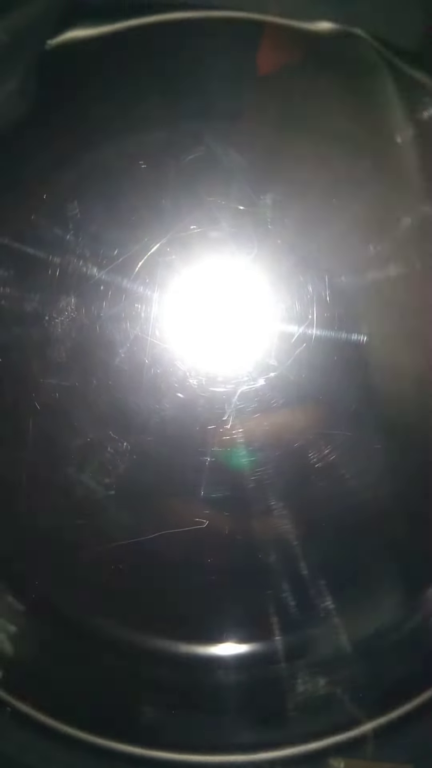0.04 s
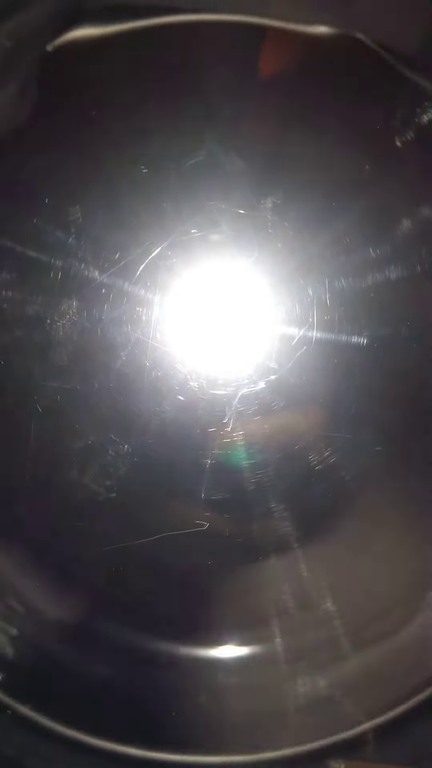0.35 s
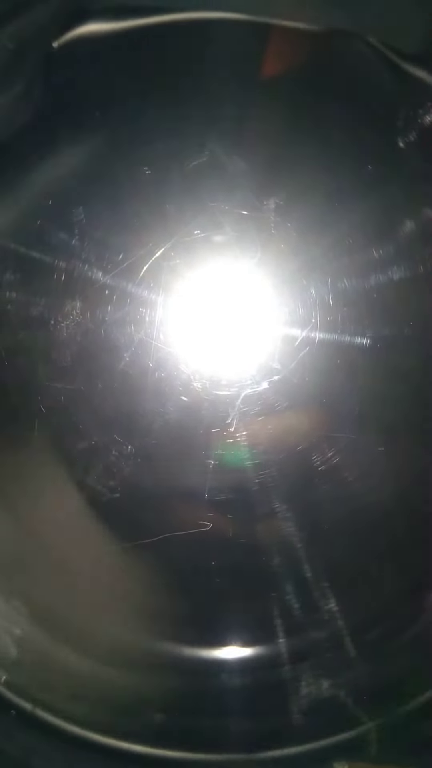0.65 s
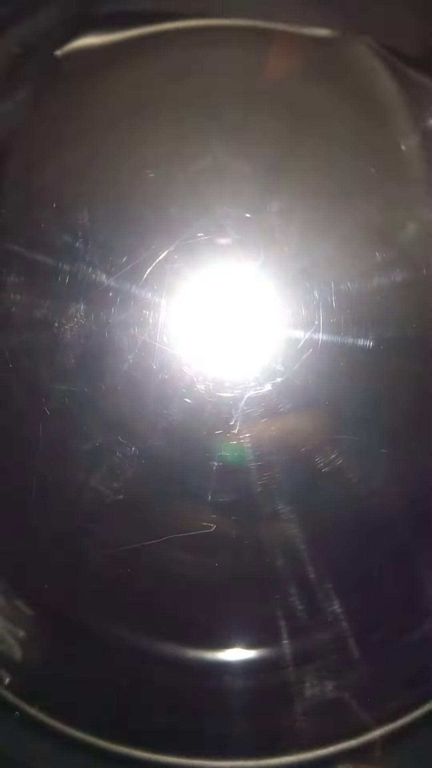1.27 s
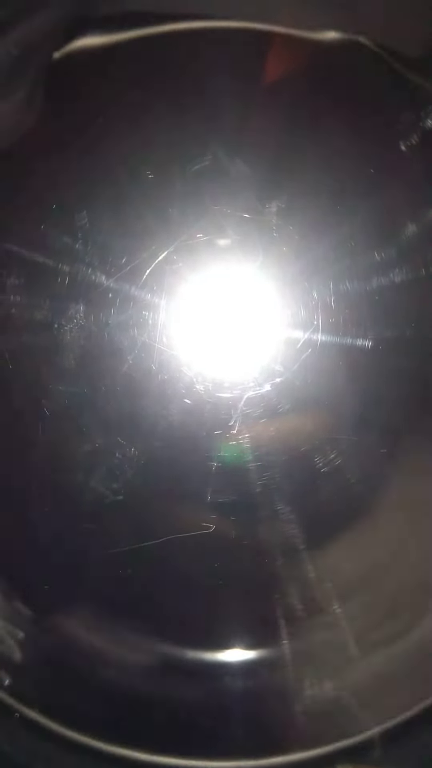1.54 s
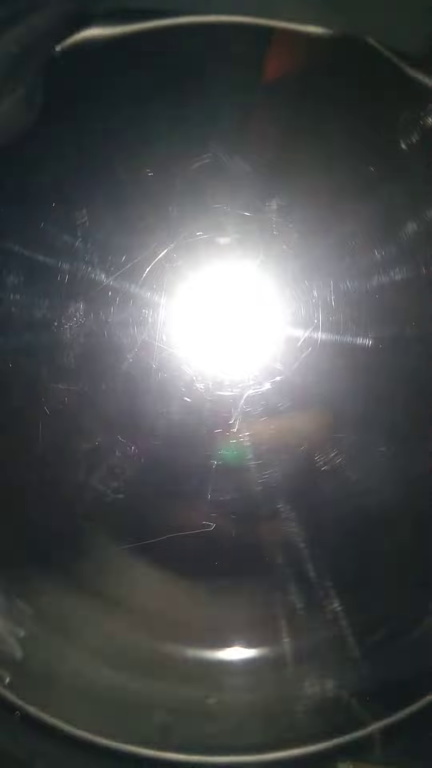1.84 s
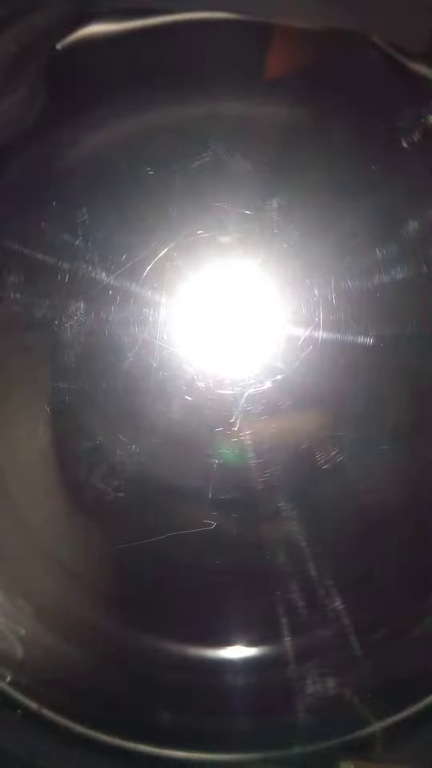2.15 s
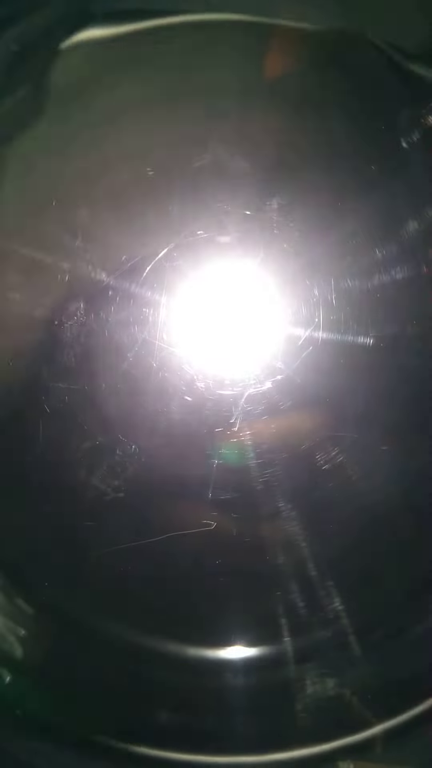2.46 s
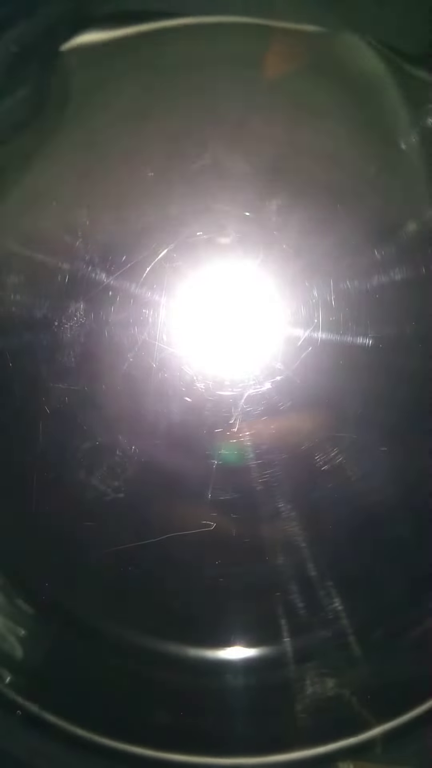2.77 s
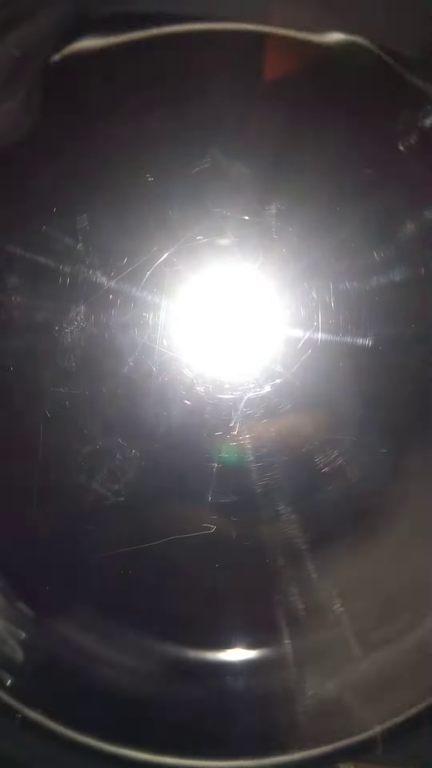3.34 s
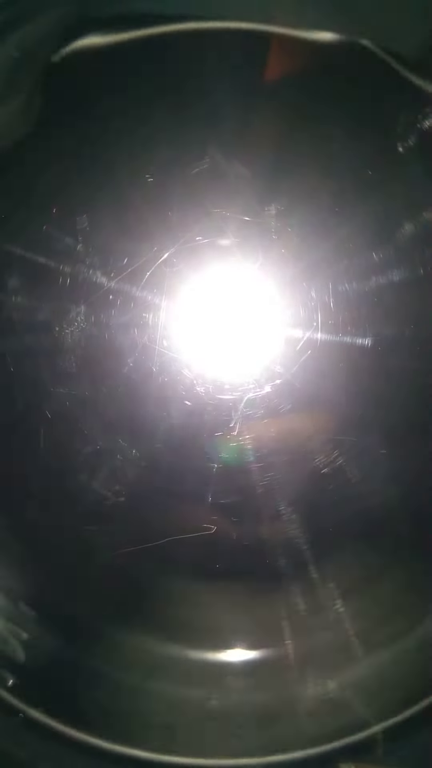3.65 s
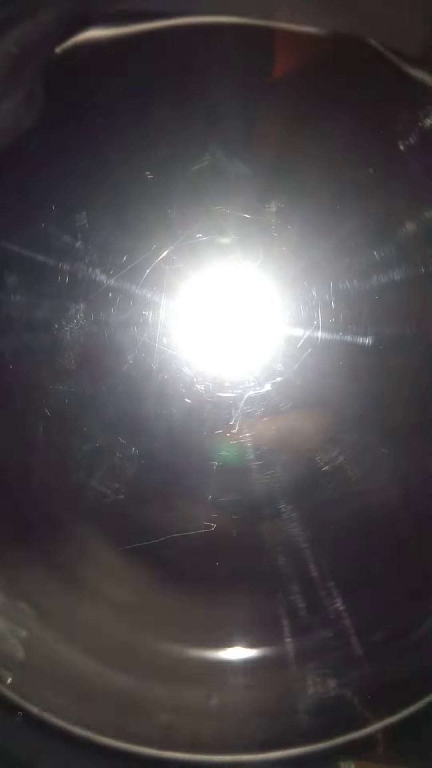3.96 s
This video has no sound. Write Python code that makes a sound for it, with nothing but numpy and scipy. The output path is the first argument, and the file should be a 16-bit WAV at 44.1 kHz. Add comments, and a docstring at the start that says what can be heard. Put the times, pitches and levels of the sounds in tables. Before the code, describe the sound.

A tumble dryer hums and rumbles steadily throughout, heard close at its door. Buttons and zips click on the steel drum several times in the first second and a half, and again around 2 and 3 seconds. From 1 second, laundry lands with soft booms roughly every half second. Scraping and slightly squeaky rubbing come between 2.5 and 3.6 seconds. The right side is muffled, with dull door bumps.

```python
"""At the door of a turning tumble dryer. The motor hums over the rumble of drum and air.
Laundry lands softly and booms the drum; buttons and zips click, slide and rub on the steel,
which rings on. The left microphone is open and hears it all. The right one is covered:
dull hum, rumble, bumps of the door and faint high whistles."""
import sys
import numpy as np
from scipy import signal
from scipy.io import wavfile

SR = 44100
rng = np.random.default_rng(int(sys.argv[2]) if len(sys.argv) > 2 else 0)


def log_audio(samples):
    """Write samples as a 16-bit WAV file to the path given in sys.argv[1]."""
    # one column per channel
    frames = np.atleast_2d(samples).T
    # limit to full scale, then quantise
    limited = np.clip(frames, -1, 1)
    pcm = np.round(limited * 32767).astype(np.int16)
    wavfile.write(sys.argv[1], SR, pcm)


N = 176400

# motor hum: pitch_hz, left_db, right_db
MOTOR_HUM = [(100.14, -48, -57), (199.1, -50.5, -74.5), (301.7, -63.5, -81), (398.2, -66.5, -99)]
# drum and air at the open microphone: freq_hz, density_db
AIR_SPECTRUM = [(20, -88), (43, -84.5), (60, -70), (85, -75.5), (130, -72), (185, -72), (235, -76),
                (285, -80.5), (360, -83.5), (480, -92.5), (720, -92), (1000, -98), (1230, -95),
                (1400, -116), (1820, -110), (2200, -128), (5000, -134), (16000, -139)]
# laundry landing: start_s, boom_hz, boom_db, slap_db, rustle_db
LANDINGS = [(.068, 134, -58, -77, -95), (0.344, 192, -59, -85, -91.5), (.482, 177, -72, -81.5, -97.5),
            (.962, 174, -45, -87, -105), (1.386, 195.5, -41.5, -80, -104), (1.826, 239.5, -45, -80, -117),
            (2.05, 205, -43.5, -78, -102), (2.32, 221, -61, -79, -99), (2.54, 230.5, -45.5, -78, -110),
            (2.821, 193.5, -40, -80.5, -108), (2.908, 130, -56, -76, -94.5), (3.19, 195, -43, -84.5, -110),
            (3.241, 260, -55, -81.5, -100), (3.611, 198, -45, -89, -101.5), (3.827, 203, -40.5, -103, -118),
            (3.928, 132, -51, -96, -103.5)]
# buttons and zips striking: start_s, low_db, mid_db, high_db, top_db, button_share
BUTTON_HITS = [(0.068, -83.5, -82, -81, -90, 1), (0.3422, -99, -83, -95.5, -103, 0.45),
               (0.4782, -90, -85, -91, -105, .95), (0.755, -92, -90, -93.5, -105, 0.78),
               (0.801, -102, -100, -93.5, -114, 0.52), (1.3237, -101, -91.5, -92.5, -90, 0.62),
               (2.124, -92.5, -89.5, -86, -89.5, 0.53), (2.856, -83.5, -79.5, -77.5, -77, 0.45),
               (3.194, -87.5, -81.5, -78.5, -85.5, 0.059)]
# click bands, low to top: freq_hz
HIT_BANDS_HZ = [2600, 5500, 9540, 12800]
# struck button: freq_hz, width_hz, gain_db
BUTTON_MODES = [(2340, 57, 4), (3400, 540, -5.5), (4370, 400, 14), (5760, 770, 16.5), (6650, 590, -2.5),
                (7530, 180, 10.5), (8900, 260, -4), (10300, 160, 4.5), (12400, 430, 3)]
# struck zip pull: freq_hz, width_hz, gain_db
ZIP_MODES = [(3780, 300, 11), (4450, 300, 6), (5800, 220, -2), (6400, 980, -16), (8070, 650, 11.5),
             (8500, 240, -12), (8930, 260, 13), (11800, 400, 2)]
# zips and cloth sliding; the first row is the drum's fading ring as the sound opens:
# start_s, rise_s, hold_s, t60_s, low_db, mid_db, high_db, top_db, cutoff_hz
SLIDE_STROKES = [(0, 0.0019, 0.0069, 1, -108, -110, -112, -130, 11900),
                 (2.045, 0.0026, 0.033, 0.15, -90.5, -102, -108, -120, 11700),
                 (2.55, 0.072, 0.0085, 0.25, -109, -101, -94.5, -112, 12000),
                 (2.708, 0.038, 0.051, 0.32, -124, -111, -99, -112, 11600),
                 (2.829, 0.0059, 0.027, 0.13, -102, -102, -102, -120, 11900),
                 (2.87, 0.083, 0.12, 0.32, -89, -93, -86, -101, 14000),
                 (3.07, 0.04, 0.026, 0.15, -94, -100, -97, -106, 13900),
                 (3.248, 0.055, 0.021, 0.68, -112, -113, -116, -131, 11300),
                 (3.602, 0.0029, 0.026, 0.19, -107, -106, -101, -124, 11500),
                 (3.922, 0.0035, 0.0043, 0.086, -106, -112, -140, -150, 4600)]
# slide bands, low to top: freq_hz
STROKE_BANDS_HZ = [2670, 5150, 10100, 14500]
# cloth and zips rubbing: start_s, length_s, first_hz, last_hz, width_hz, level_db
RUBS = [(1.451, 0.1, 1916, 1904, 260, -70), (1.771, 0.086, 1866, 1753, 281, -69.5),
        (2.34, 0.098, 2040, 1930, 342, -76.5), (2.498, 0.18, 1656, 1516, 420, -63.5),
        (2.566, 0.15, 1390, 1248, 476, -57.5), (2.525, 0.21, 3870, 3330, 450, -74.5),
        (2.578, 0.048, 4610, 4800, 500, -65), (2.74, 0.067, 4780, 4850, 300, -77),
        (2.93, 0.29, 2286, 2110, 680, -55), (3.263, 0.32, 2230, 2060, 380, -69.5),
        (3.26, 0.39, 4040, 3890, 435, -74.5), (3.328, 0.26, 10300, 9300, 850, -75),
        (3.463, 0.17, 1816, 1694, 294, -75)]
# hard knocks through cloth: start_s, ring_hz, density_db
HARD_KNOCKS = [(.964, 1926, -92.5), (1.386, 925, -81.5), (1.389, 2350, -91), (2.049, 816, -75.5),
               (2.052, 2774, -82.5), (3.243, 691, -67), (3.612, 1850, -86.5), (3.799, 1124, -85),
               (3.927, 1870, -80), (3.931, 710, -70)]
# small knocks of the load: freq_hz, relative_db
RATTLE_SPECTRUM = [(100, -110), (300, -79), (700, -76.5), (1200, -89), (1450, -104), (1900, -104),
                   (2600, -118), (4000, -140), (16000, -160)]
# drum wall: freq_hz, width_hz, gain_db
WALL_MODES = [(2380, 1400, -1), (2835, 210, 6), (3020, 370, -5.5), (4120, 810, 6), (4840, 1100, 0.5),
              (5830, 490, 2), (6600, 540, -4), (7700, 370, 4.5), (10000, 1500, 0.5)]
# ring inside the drum: freq_hz, t60_s
RING_DECAY = [(1000, 0.55), (4000, 0.33), (9000, 0.31), (15000, 0.17)]
# narrow peaks of that ring: freq_hz, width_hz, gain_db
RING_MODES = [(1890, 83, 1), (2330, 140, 5.5), (2920, 140, 6), (3300, 70, 3), (4370, 110, 3),
              (5000, 160, 4), (5680, 91, 2)]
# door bumping the covered microphone: start_s, pitch_hz, level_db
DOOR_BUMPS = [(0.673, 74.6, -43.5), (1.195, 83.5, -41.5), (2.916, 70.4, -38.5), (3.287, 62, -35),
              (3.519, 65.4, -40.5), (3.694, 73.4, -37)]
# drum and air at the covered microphone: freq_hz, density_db
COVERED_SPECTRUM = [(20, -87), (35, -86), (55, -78.5), (72, -71), (130, -77), (200, -94.5), (320, -100),
                    (450, -117), (1000, -129), (8000, -136), (16000, -139)]
# hum and rumble at the covered microphone: time_s, gain_db
COVERED_GAIN = [(0, 0.5), (1.2, -0.5), (1.8, -1.5), (2.0, -6), (2.3, -2.5), (2.8, -7.5), (3.1, -1),
                (3.7, 0.5), (4, -11.5)]
# fan and cabinet tones: pitch_hz, width_hz, level_db
FAN_WHINES = [(226.6, 12, -58.5), (275.5, 19, -66.5), (427, 4.1, -69.5), (699, 19, -76.5), (953, 14, -72.5),
              (1133, 1.4, -86), (1219.5, 14, -75.5)]
# cloth brushing the drum: pitch_hz, width_hz, level_db
BRUSH_TONES = [(1814, 92, -80)]
# faint whistles, both sides: pitch_hz, width_hz, level_db
HIGH_WHISTLES = [(6060, 220, -100), (10080, 120, -99), (12030, 170, -102)]


def motor(waver_rad=0.082, flutter=0.08, right_lag_rad=1):
    """Mains hum and overtones, shaken slightly by the load."""
    t, out = np.arange(N) / SR, np.zeros((2, N))
    for hz, left_db, right_db in MOTOR_HUM:
        phase = 2 * np.pi * (hz * t + rng.random())
        phase += waver_rad * np.sqrt(hz / MOTOR_HUM[0][0]) * wobble(10)
        pair = np.sqrt(2) * np.sin([phase, phase - right_lag_rad])
        out += amp([[left_db], [right_db]]) * pair * (1 + flutter * wobble(3.2))
    out[1] *= covered_gain()
    return out


def rumble(swell_db=1, swell_hz=8.9):
    """Drum and air: low noise, slightly unsteady."""
    return steady_noise(AIR_SPECTRUM) * amp(swell_db * wobble(swell_hz))


def laundry(cloth_gain_db=0.5, boom_gain_db=2.5, bands_hz=(580, 1620)):
    """Soft landings: the drum booms at one low resonance, the cloth slaps and rustles."""
    cloth, booms = np.zeros((2, N))
    for start_s, boom_hz, boom_db, *bands_db in LANDINGS:
        def colour(hz):
            body = lookup(zip(bands_hz, bands_db), hz) + band(hz, 140, 3, 2110, 6)
            return body + wall_patch(hz) * np.minimum(hz / 2000, 1)
        add(cloth, start_s, coloured(burst(rise_s=0.00069, hold_s=0.0066, t60_s=0.087), colour))
        shape = envelope(rise_s=0.012, hold_s=0.004, t60_s=0.18)
        add(booms, start_s, amp(boom_db) * panel_boom(boom_hz, shape))
    return amp(cloth_gain_db) * (cloth + drum_ring(cloth)) + amp(boom_gain_db) * booms


def buttons(gain_db=-1, ring_db=-5, colour_carry=0.28):
    """Brief chatter in the modes of button and zip; the drum rings on with less of their colour."""
    direct, wall = np.zeros((2, N))
    for start_s, *bands_db, share in BUTTON_HITS:
        body = lambda hz: lookup(zip(HIT_BANDS_HZ, bands_db), hz) + band(hz, 1300, 2, 14300, 16)
        modes = lambda hz: share * peaks(BUTTON_MODES, hz) + (1 - share) * peaks(ZIP_MODES, hz)
        chatter = burst(rise_s=0.0031, hold_s=0.0018, t60_s=0.031)
        add(direct, start_s, coloured(chatter, lambda hz: body(hz) + modes(hz)))
        add(wall, start_s, coloured(chatter, lambda hz: body(hz) + colour_carry * modes(hz)))
    return amp(gain_db) * (direct + amp(ring_db) * drum_ring(wall))


def slides(grains_per_s=5500, grain_spread_db=7, gain_db=-5.5, ring_db=-8.5):
    """Fine grains of friction excite the drum wall; the first row is its fading ring."""
    out = np.zeros(N)
    for start_s, rise_s, hold_s, t60_s, *bands_db, cutoff_hz in SLIDE_STROKES:
        def colour(hz):
            body = lookup(zip(STROKE_BANDS_HZ, bands_db), hz) + band(hz, 1800, 3, cutoff_hz, 22)
            return body + peaks(WALL_MODES, hz) + wall_patch(hz, spread_db=3.06)
        grains = rng.standard_normal(N) * amp(-grain_spread_db * np.minimum(rng.exponential(1, N), 4))
        grains *= rng.random(N) < grains_per_s / SR
        shape = envelope(rise_s, hold_s, t60_s)
        add(out, start_s, coloured(shape * unit(grains)[:len(shape)], colour))
    return amp(gain_db) * (out + amp(ring_db) * drum_ring(out))


def squeaks(catch_db=4, catch_hz=70, ring_db=-11.5):
    """Fuzzy rubbing resonances swell and glide, mostly down, catching and slipping."""
    t, out = np.arange(N) / SR, np.zeros(N)
    for start_s, length_s, first_hz, last_hz, width_hz, level_db in RUBS:
        progress = np.clip((t - start_s) / length_s, 0, 1)
        cycles = np.cumsum(first_hz + (last_hz - first_hz) * progress ** 2) / SR
        grip = unit(amp(catch_db * wobble(catch_hz)))
        swell = np.sin(np.pi * progress ** 0.57)  # peaks early
        out += amp(level_db) * grip * swell * fuzzy_tone(cycles, width_hz)
    return out + amp(ring_db) * drum_ring(out)


def knocks(width_hz=56, ring_db=-11):
    """A hard part of the load lands and rings one patch of the drum."""
    out = np.zeros(N)
    for start_s, ring_hz, density_db in HARD_KNOCKS:
        def colour(hz):
            resonance = skirt(abs(hz - ring_hz) / (width_hz / 2), order=1)
            return density_db + resonance + skirt(hz / 3500, order=6) + peaks(WALL_MODES, hz)
        add(out, start_s, coloured(burst(rise_s=0.00033, hold_s=0.0037, t60_s=0.12), colour))
    return out + amp(ring_db) * drum_ring(out)


def rattle(hits_per_s=24, spread_db=4, gain_db=-8):
    """Small random knocks of the turning load."""
    hits = amp(spread_db * rng.uniform(-1, 1, N)) * (rng.random(N) < hits_per_s / SR)
    shape = signal.fftconvolve(hits, envelope(rise_s=0.00069, hold_s=0, t60_s=0.035))[:N]
    out = coloured(shape * rng.standard_normal(N), lambda hz: lookup(RATTLE_SPECTRUM, hz))[:N]
    return amp(gain_db) * (out + drum_ring(out))


def door(roughness=0.5, rough_hz=45):
    """Dull rumble and bumps reach the covered microphone by contact."""
    bumps = np.zeros(N)
    for start_s, hz, level_db in DOOR_BUMPS:
        shape = envelope(rise_s=0.0093, hold_s=0.0058, t60_s=0.19)
        add(bumps, start_s, amp(level_db) * panel_boom(hz, shape))
    dull_rumble = steady_noise(COVERED_SPECTRUM) * covered_gain()
    return dull_rumble + bumps * (1 + roughness * drift(rough_hz).real)


def whines(table):
    """Narrow wavering tones."""
    t = np.arange(N) / SR
    return sum(amp(db) * unit(fuzzy_tone(hz * t, width_hz)) for hz, width_hz, db in table)


def brush(swell_db=13, swell_hz=3.5):
    """Cloth brushes the turning drum in random swells."""
    return whines(BRUSH_TONES) * unit(amp(swell_db * wobble(swell_hz)))


def drum_ring(x, rise_s=0.0071):
    """Dense echoes inside the steel drum, strongest at its narrow resonances."""
    hz, t, noise = signal.stft(rng.standard_normal(SR // 2), SR, nperseg=256)
    decay = np.exp(-np.log(1000) * t / lookup(RING_DECAY, hz)[:, None])
    tail = signal.istft(noise * decay, SR, nperseg=256)[1]
    tail *= np.minimum(np.arange(len(tail)) / SR / rise_s, 1)
    colour = lambda hz: peaks(RING_MODES, hz) + wall_patch(hz, spread_db=1.15, spacing_hz=112.5)
    tail = coloured(tail, colour)
    return signal.fftconvolve(x, tail / np.linalg.norm(tail))[:N]


def wall_patch(hz, spread_db=3.5, spacing_hz=260):
    """Uneven resonances of a random patch of wall, in dB."""
    return spread_db * np.interp(hz / spacing_hz, np.arange(400), rng.standard_normal(400))


def panel_boom(hz, shape):
    """One low panel resonance swells and dies."""
    return shape * np.sin(2 * np.pi * hz * np.arange(len(shape)) / SR)


def covered_gain():
    """Dips in level at the covered microphone."""
    return amp(np.interp(np.arange(N) / SR, *np.transpose(COVERED_GAIN)))


def amp(db):
    """Decibels to gain."""
    return 10 ** (np.asarray(db) / 20)


def unit(x):
    """Scale to unit rms."""
    return x / np.sqrt(np.mean(abs(x) ** 2) + 1e-20)


def lookup(points, hz):
    """Interpolate over log frequency."""
    freq_hz, value = np.transpose(list(points))
    return np.interp(np.log(hz + 1), np.log(freq_hz + 1), value)


def add(mix, start_s, sound):
    """Mix in place."""
    part = mix[max(round(start_s * SR), 0):][:len(sound)]
    part += sound[:len(part)]


def coloured(x, curve_db, size=8192):
    """Minimum-phase filter; unit white noise comes out with spectral density curve_db(hz)."""
    density_db = np.maximum(curve_db(np.fft.rfftfreq(size, 1 / SR)), -170)
    log_gain = np.log(amp(density_db) * np.sqrt(SR / 2))
    mirrored = np.concatenate([log_gain, log_gain[-2:0:-1]])
    response = np.exp(signal.hilbert(mirrored).conj())
    return signal.fftconvolve(x, np.fft.ifft(response).real[:size // 2])


def peaks(modes, hz):
    """Bell-shaped resonances, in dB."""
    return sum(db / (1 + (2 * (hz - mode_hz) / width_hz) ** 2) for mode_hz, width_hz, db in modes)


def skirt(ratio, order):
    """Roll-off in dB as the ratio passes one."""
    return -10 * np.log10(1 + ratio ** (2 * order))


def band(hz, low_hz, low_order, high_hz, high_order):
    """Band-pass curve, in dB."""
    return skirt(low_hz / (hz + 1), low_order) + skirt(hz / high_hz, high_order)


def envelope(rise_s, hold_s, t60_s):
    """Linear rise, hold, exponential release."""
    t = np.arange(0, rise_s + hold_s + t60_s, 1 / SR)
    release = np.exp(-np.log(1000) * np.maximum(t - rise_s - hold_s, 0) / t60_s)
    return np.minimum(t / rise_s, 1) * release


def burst(rise_s, hold_s, t60_s):
    """Noise puff with the energy of its envelope."""
    shape = envelope(rise_s, hold_s, t60_s)
    puff = shape * rng.standard_normal(SR * 2)[:len(shape)]
    return puff * np.linalg.norm(shape) / np.linalg.norm(puff)


def drift(rate_hz):
    """Complex low-pass noise, unit rms."""
    spectrum = rng.standard_normal(N) + 1j * rng.standard_normal(N)
    return unit(np.fft.ifft(spectrum * np.exp(-(np.fft.fftfreq(N, 1 / SR) / rate_hz) ** 2)))


def wobble(rate_hz):
    """Real low-pass noise, unit rms."""
    return unit(drift(rate_hz).real)


def fuzzy_tone(cycles, width_hz):
    """Narrow noise band around a carrier."""
    return (drift(width_hz / 2) * np.exp(2j * np.pi * cycles)).real


def steady_noise(spectrum):
    """Constant noise with the given spectrum."""
    return coloured(rng.standard_normal(N + SR), lambda hz: lookup(spectrum, hz))[SR:SR + N]


def scene():
    """Open microphone left, covered microphone right."""
    left = rumble() + whines(FAN_WHINES) + brush()
    left = left + laundry() + knocks() + rattle() + buttons() + slides() + squeaks()
    return motor() + np.array([left + whines(HIGH_WHISTLES), door() + whines(HIGH_WHISTLES)])


def record(dry):
    """Steep low-pass at 15850 Hz."""
    taps = signal.firwin(255, 15850, window=("kaiser", 9), fs=SR)
    return signal.oaconvolve(dry, taps[None], "same")


dry = scene()
out = record(dry)
log_audio(out)
```